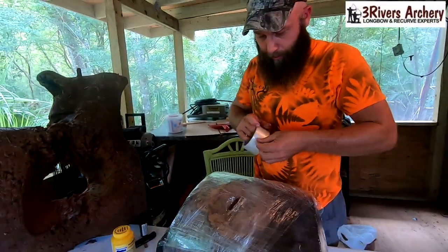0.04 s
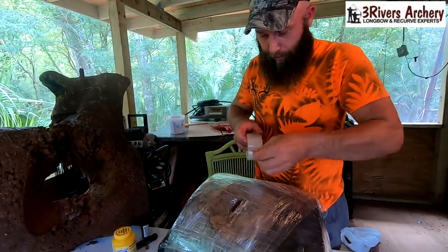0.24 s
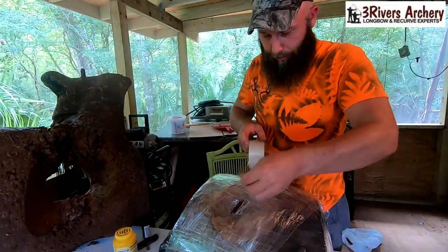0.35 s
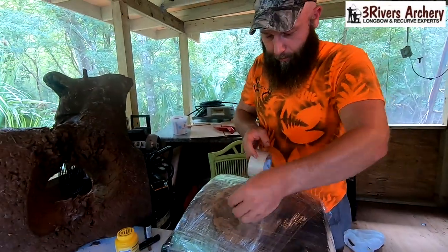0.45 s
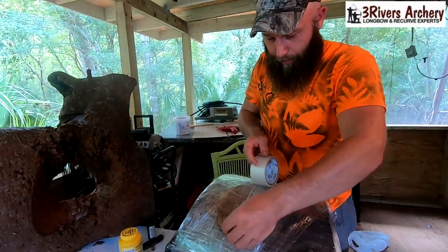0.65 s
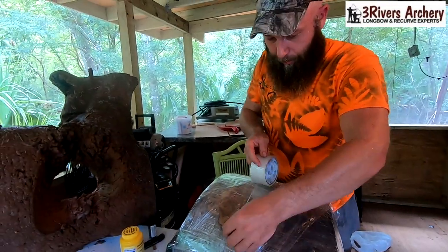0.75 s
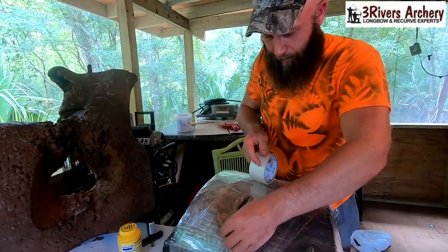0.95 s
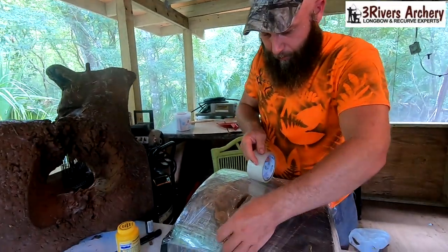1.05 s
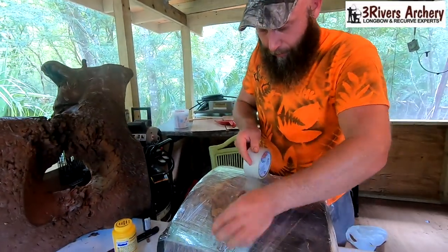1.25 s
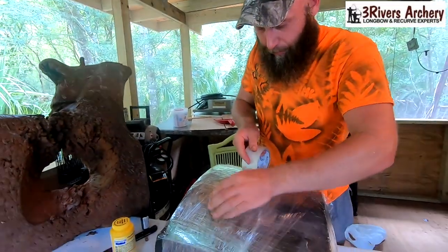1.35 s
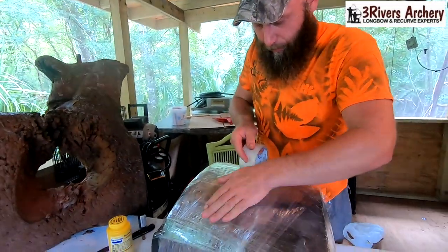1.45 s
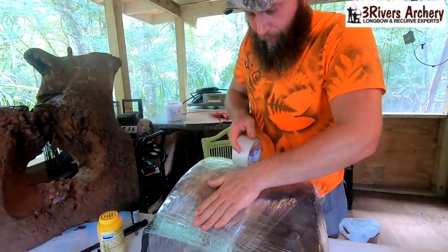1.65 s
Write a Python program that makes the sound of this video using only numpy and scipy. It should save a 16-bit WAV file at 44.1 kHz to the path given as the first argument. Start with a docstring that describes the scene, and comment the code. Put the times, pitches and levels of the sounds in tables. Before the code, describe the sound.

Adhesive tape comes off a roll in one longer rasping rip and three short tugs. After a pause it snaps sharply and is smoothed onto plastic wrap with faint crinkles, nearby, with short echoes under a porch roof.

```python
"""Pulling tape on a porch

Adhesive tape comes off its roll under a porch roof: one long rasping rip, then three short tugs.
The glue lets go in tiny uneven slips that crackle, ring the taut strip and shake the hollow roll.
Later the tape snaps, peels a little more and is smoothed onto a plastic-wrapped block, with soft
crinkles and dull pushes of the hands. Short echoes follow it all, over a faint drone and hiss."""
import sys
import numpy as np
from scipy import signal
from scipy.fft import rfft, irfft
from scipy.io import wavfile

SR = 44100
rng = np.random.default_rng(int(sys.argv[2]) if len(sys.argv) > 2 else 0)


def bounce(signal):
    """Save signal as a 16-bit WAV file at the path given by the first command-line argument."""
    frames = np.transpose(np.atleast_2d(signal))
    limited = np.clip(frames, -1, 1)
    pcm = np.round(limited * 32767).astype(np.int16)
    wavfile.write(sys.argv[1], SR, pcm)


N = 74970
TIME_S, FREQ_HZ = np.arange(N) / SR, np.fft.rfftfreq(2 * N, 1 / SR)
HAND_ATTACK_S = 0.012  # the hands press in more gently than the glue lets go
THREADS_PER_S, THREAD_SPREAD_DB = 12000, 2  # glue threads snapping between slips

# Tone of tape rubbing and peeling on the wrap: frequency_hz, relative_level_db
RUB_TONE = [(100, -40), (250, -11.5), (500, -7.5), (1200, -1.5), (2300, -2), (3600, 2), (6000, -4),
            (8700, -2.5), (10500, -19), (16000, -10)]


def gain(db):
    """Turns decibels into a number to multiply by."""
    return 10 ** (np.asarray(db) / 20)


def normalise(x):
    """Scales a signal to an average power of 1."""
    return x / np.sqrt(np.mean(x ** 2) + 1e-20)


def look_up(table, hz):
    """Reads between the rows of a table, on a logarithmic frequency scale."""
    row_hz, values = np.transpose(table)
    return np.interp(np.log(hz + 1), np.log(row_hz + 1), values)


def colour(x, tone):
    """Shapes bass and treble to follow a tone table, with a filter of power 1."""
    cepstrum = irfft(np.log(normalise(gain(look_up(tone, FREQ_HZ)))))
    # Folding it in half makes the filter ring only after a click, never before.
    cepstrum[1:N] *= 2
    cepstrum[N + 1:] = 0
    return irfft(rfft(x, 2 * N) * np.exp(rfft(cepstrum)))[..., :N]


def resonate(x, hz, width_hz):
    """Rings at a steady or moving pitch; a narrower width rings longer."""
    spin = np.exp(2j * np.pi * np.cumsum(hz * np.ones(N)) / SR)
    decay = np.exp(-np.pi * width_hz / SR)
    return 2 * (spin * signal.lfilter([1 - decay], [1, -decay], x / spin + 1e-18)).real


def diffuse_stereo(two_signals):
    """Makes left and right partly alike, as sound from all around is at two nearby points."""
    # How well the sides match: frequency_hz, likeness (1 = the same, 0 = unrelated)
    side_match = [(100, 0.96), (330, 0.9), (650, 0.49), (1400, 0.37), (3000, 0.81), (6500, 0.17),
                  (9000, -0.094), (15000, 0.032)]
    likeness = np.clip(look_up(side_match, FREQ_HZ), -1, 1)
    first, second = rfft(two_signals, 2 * N)
    mid, side = first * np.sqrt((1 + likeness) / 2), second * np.sqrt((1 - likeness) / 2)
    return irfft(np.array([mid + side, mid - side]))[:, :N]


def stroke(start_s, length_s, attack_s=0.00045, release_s=0.0061):
    """Loudness of one movement: it rises, holds, then dies away."""
    rise = np.clip((TIME_S - start_s) / attack_s, 0, 1)
    return rise * np.exp(-np.maximum(TIME_S - start_s - length_s, 0) / release_s)


def tiny_clicks(per_s, spread_db):
    """Clicks of uneven size and sign, at random moments."""
    size = gain(spread_db * np.clip(rng.standard_normal(N), -2, 2))
    return normalise(size * rng.choice([-1, 1], N) * (rng.random(N) < per_s / SR))


def background_air():
    """A steady low drone and faint hiss."""
    # Tone of the air: frequency_hz, relative_level_db
    air_tone = [(25, -56), (60, -6.5), (110, -12), (160, -1), (220, 0.5), (300, -10), (550, -12.5),
                (750, -12.5), (2000, -16), (4500, -15), (9000, -22), (11500, -34), (14000, -50),
                (16000, -68)]
    noise = diffuse_stereo(rng.standard_normal((2, N)))
    return gain(-56) * normalise(colour(noise, air_tone))


def echo_pattern(early_db=-1.5, early_gap_s=0.0004, early_fade_s=0.0077, tail_db=-7, tail_gap_s=0.0062):
    """Quick echoes from the bench and block, then a short tail from the roof."""
    # Time the tail takes to fade by 60 dB: frequency_hz, fade_s
    fade_times = [(150, 0.24), (600, 0.22), (2000, 0.24), (4000, 0.22), (8000, 0.25), (15000, 0.13)]
    early = rng.choice([-1., 1.], (2, N)) * (rng.random((2, N)) < 0.2)
    early *= np.exp(-TIME_S / early_fade_s) * (TIME_S > early_gap_s)
    bounces = rng.choice([-1., 1.], (2, N)) * (rng.random((2, N)) < 0.1) * (TIME_S > tail_gap_s)
    hz, seconds, bands = signal.stft(bounces, SR, nperseg=256)
    bands *= gain(-60 * seconds / look_up(fade_times, hz)[:, None])
    tail = signal.istft(bands, SR, nperseg=256)[1][:, :N]
    echoes = sum(gain(db) * part / np.linalg.norm(part, axis=1, keepdims=True)
                 for db, part in [(early_db, early), (tail_db, tail)])
    return diffuse_stereo(echoes)


def porch(x, echo_db=0, moves_per_s=9):
    """Direct sound plus two echo patterns that trade places as the hands move."""
    # Tone of the sound that arrives without bouncing: frequency_hz, level_db
    direct_tone = [(100, -4), (700, -2.5), (3000, -2.5), (6500, -2), (9000, -3), (15000, -23)]
    direct = irfft(rfft(x, 2 * N) * gain(look_up(direct_tone, FREQ_HZ)))[:N]
    angle = np.pi * moves_per_s * TIME_S
    echoes = sum(signal.fftconvolve((x * share)[None], echo_pattern(), axes=1)[:, :N]
                 for share in (np.cos(angle), np.sin(angle)))
    return direct + gain(echo_db) * echoes


def rubbing():
    """Tape crinkles finely as it is lightly peeled and rubbed on the wrap."""
    # Light rubs: start_s, length_s, level_db
    rubs = [(0.04, 0.034, -52.5), (0.127, 0.046, -51), (1.105, 0.071, -57.5), (1.184, 0.11, -50),
            (1.282, 0.044, -41), (1.422, 0.37, -60), (1.651, 0.06, -51.5)]
    loudness = sum(gain(db) * stroke(start_s, length_s, HAND_ATTACK_S) for start_s, length_s, db in rubs)
    return colour(tiny_clicks(per_s=5000, spread_db=0.5) * loudness, RUB_TONE)


def rising_zips(width_hz=300, octave_db=-7):
    """Snapping glue threads make a quick rising whistle as the tape lets go."""
    # Zips: start_s, length_s, from_hz, to_hz, level_db
    zips = [(1.3, 0.023, 1200, 2700, -46), (1.323, 0.008, 2900, 6000, -41)]
    out = np.zeros(N)
    for start_s, length_s, from_hz, to_hz, db in zips:
        threads = tiny_clicks(THREADS_PER_S, THREAD_SPREAD_DB)
        hz = np.exp(np.interp(TIME_S, [start_s, start_s + length_s], np.log([from_hz, to_hz])))
        whistle = resonate(threads, hz, width_hz) + gain(octave_db) * resonate(threads, 2 * hz, width_hz)
        out += gain(db) * stroke(start_s, length_s) * normalise(colour(whistle, RUB_TONE))
    return out


def hand_pushes(width_hz=95):
    """The block and the roll give dull hollow tones as the hands push on them."""
    # Pushes: start_s, length_s, level_db, pitch_hz
    pushes = [(0.0, 0.016, -46, 156), (0.02, 0.056, -48.5, 95), (0.087, 0.1, -54.5, 151),
              (0.426, 0.014, -23.5, 735), (0.467, 0.015, -40.5, 772), (0.564, 0.1, -50, 167),
              (1.188, 0.053, -58.5, 161), (1.252, 0.029, -46.5, 161), (1.323, 0.026, -51, 155),
              (1.447, 0.18, -58, 173), (1.651, 0.026, -48, 118)]
    out = np.zeros(N)
    for start_s, length_s, db, hz in pushes:
        thud = resonate(resonate(rng.standard_normal(N), hz, width_hz), hz, width_hz)
        out += gain(db) * stroke(start_s, length_s, HAND_ATTACK_S) * normalise(thud)
    return out


def tape_snaps(rattle_s=0.0007, rattle_db=-3):
    """Each snap is one sharp click with a very short rattle of the plastic film."""
    # Snaps: start_s, level_db
    snaps = [(0.061, -38), (0.146, -38), (1.264, -13), (1.2688, -9), (1.2746, -18), (1.466, -37),
             (1.669, -34), (1.678, -36)]
    # Tone of a snap: frequency_hz, relative_level_db
    snap_tone = [(100, -25), (500, 1.5), (4000, 0.5), (8500, -2.5), (11000, -6.5), (16000, -32)]
    out = np.zeros(N)
    for start_s, db in snaps:
        rattle = rng.choice([-1, 1], N) * (TIME_S > start_s) * np.exp(-abs(TIME_S - start_s) / rattle_s)
        out += gain(db + rattle_db) * rattle / np.linalg.norm(rattle)
        out[round(start_s * SR)] = -gain(db)  # the click itself
    return colour(out, snap_tone)


def glue_slips(per_s=850, jitter=0.35, spread_db=2, count=3000):
    """The glue sticks, then jumps across the tape's whole width: one click for each jump."""
    wait, size = np.clip(rng.standard_normal((count, 2)), -2, 2).T
    times_s = np.cumsum(np.exp(jitter * wait)) / per_s
    clicks = np.bincount((times_s * SR).astype(int), gain(spread_db * size), N)[:N]
    return normalise(clicks - clicks.mean())


def tape_rips(thread_db=1, note_width_hz=2330):
    """Slips and snapping glue threads crackle, ring the strip, flutter the film and shake the roll."""
    # Surges of peeling: start_s, length_s, crackle_db, strip_db, film_db, roll_db, strip_pitch_hz
    surges = [(0.1865, 0.01, -45.5, -50.5, -56, -67, 3430), (0.2030, 0.04, -20, -34, -40.5, -46.5, 3960),
              (0.243, 0.0053, -19.5, -21, -26, -41, 3260), (0.257, 0.028, -27, -24, -29.5, -32, 3230),
              (0.283, 0.034, -26.5, -22, -24, -31.5, 2400), (0.323, 0.027, -30, -69, -32.5, -33.5, 2420),
              (0.343, 0.0057, -45, -21, -35, -46, 2690), (0.354, 0.034, -38.5, -46.5, -34.5, -45, 1860),
              (0.4313, 0.018, -22, -28.5, -22, -31.5, 3150), (0.5195, 0.033, -25, -46, -31.5, -39.5, 3260),
              (0.566, 0.0075, -29.5, -58, -33, -43, 3300), (0.6002, 0.0073, -23, -36, -24, -33, 2960)]
    # Steady pitches at which the taut strip rings: pitch_hz, width_hz, relative_level_db
    strip_rings = [(1900, 260, -2), (2350, 150, 0), (2830, 180, -2), (3080, 120, -2), (3500, 160, -3),
                   (3740, 220, -4), (4350, 220, -4)]
    # Tones of the crackling glue, fluttering film and hollow roll: frequency_hz, relative_level_db
    crackle_tone = [(100, -48.5), (350, -9.5), (700, -2.5), (1300, -3.5), (2200, 5.5), (3700, 2), (5000, 0),
                    (6500, 0), (8700, 2), (10000, -6.5), (13000, -15.5), (16000, -27)]
    film_tone = [(100, -35.5), (280, -17), (400, 0.5), (520, -0.5), (630, -1.5), (770, -8), (1200, -2),
                 (1900, -0.5), (2600, -7), (6000, -37.5)]
    roll_tone = [(50, -22), (110, -29.5), (155, -4.5), (200, -6.5), (255, 1.5), (320, -3), (400, 4),
                 (600, -8.5), (1200, -25.5), (5000, -42)]
    glue = normalise(glue_slips() + gain(thread_db) * tiny_clicks(THREADS_PER_S, THREAD_SPREAD_DB))
    starts_s, lengths_s, *levels_db, pitches_hz = np.transpose(surges)
    strokes = np.array([stroke(start_s, length_s) for start_s, length_s in zip(starts_s, lengths_s)])
    crackle_gain, strip_gain, film_gain, roll_gain = gain(levels_db) @ strokes  # sums over the surges
    # The strip's own broad note glides from the middle of one surge to the next.
    pitch_hz = np.interp(TIME_S, starts_s + lengths_s / 2, pitches_hz)
    note = resonate(resonate(glue, pitch_hz, note_width_hz), pitch_hz, note_width_hz)
    strip = normalise(sum(gain(db) * resonate(note, hz, width_hz) for hz, width_hz, db in strip_rings))
    crackle = colour(glue * crackle_gain, crackle_tone)
    film = colour(glue * film_gain, film_tone)
    roll = colour(glue * roll_gain, roll_tone)
    return crackle + strip * strip_gain + film + roll


def scene():
    """The tape, a little right of centre, under the porch roof."""
    tape_and_hands = tape_rips() + rubbing() + rising_zips() + hand_pushes()
    mix = porch(tape_and_hands) + porch(tape_snaps(), echo_db=0.5) + background_air()
    return mix * gain([[-0.5], [0.5]])  # left, right


def record(dry):
    """Cuts off the very highest treble."""
    low_pass = signal.firwin(511, cutoff=15800, window=("kaiser", 9), fs=SR)
    return signal.oaconvolve(dry, low_pass[None], "same")


dry = scene()
out = record(dry)
bounce(out)
```